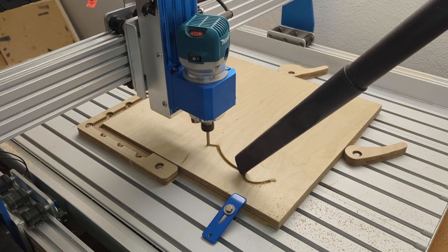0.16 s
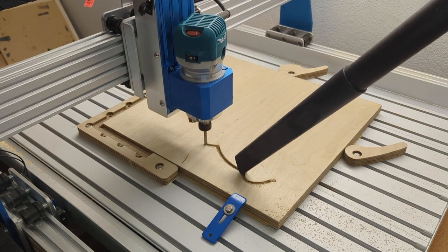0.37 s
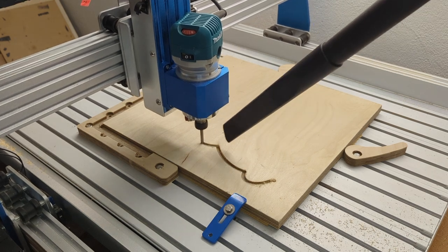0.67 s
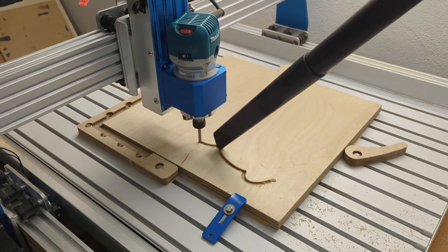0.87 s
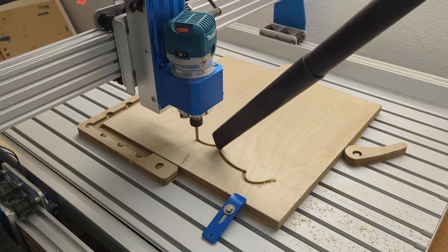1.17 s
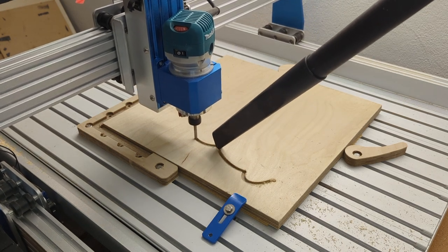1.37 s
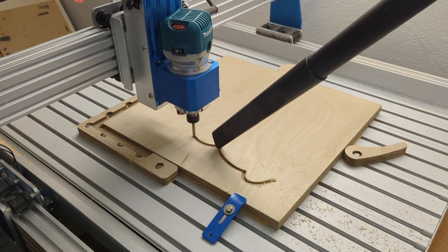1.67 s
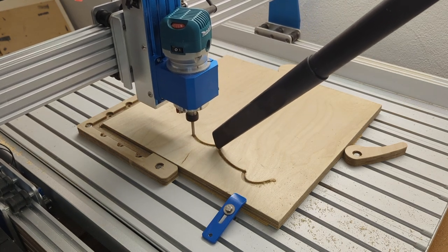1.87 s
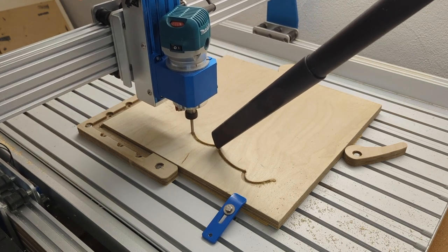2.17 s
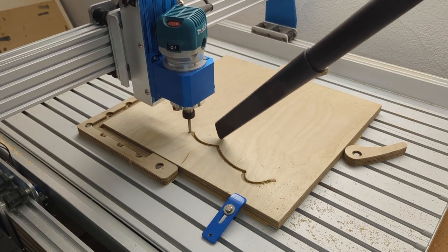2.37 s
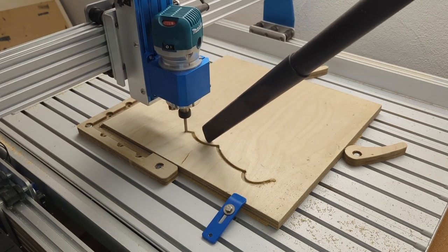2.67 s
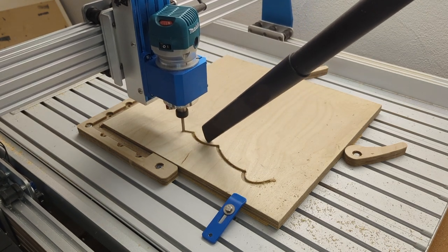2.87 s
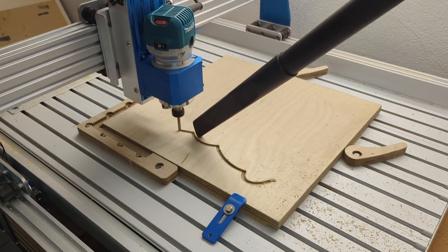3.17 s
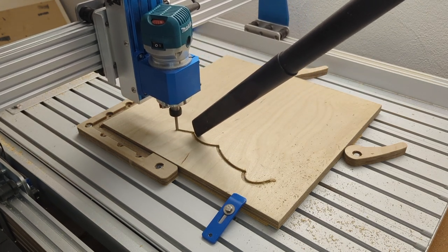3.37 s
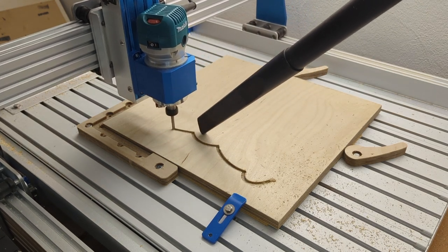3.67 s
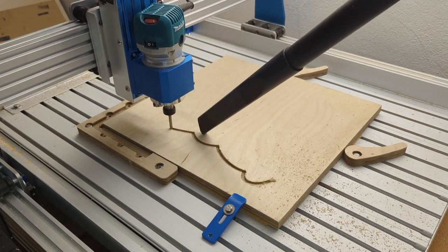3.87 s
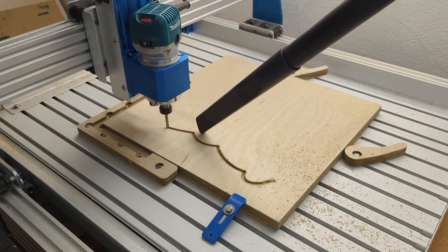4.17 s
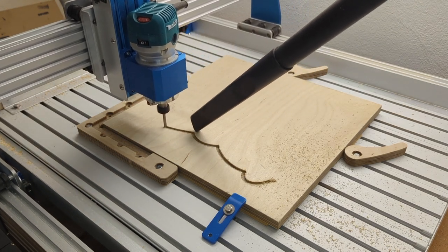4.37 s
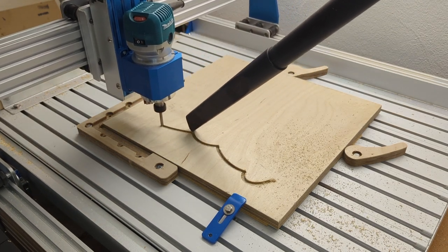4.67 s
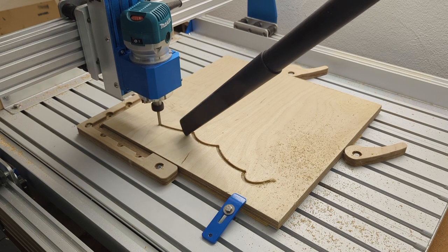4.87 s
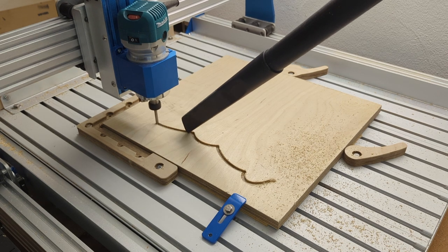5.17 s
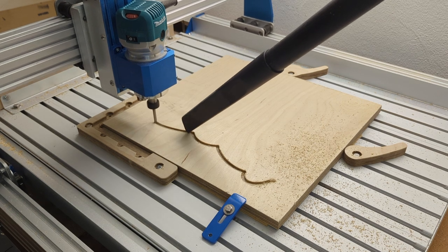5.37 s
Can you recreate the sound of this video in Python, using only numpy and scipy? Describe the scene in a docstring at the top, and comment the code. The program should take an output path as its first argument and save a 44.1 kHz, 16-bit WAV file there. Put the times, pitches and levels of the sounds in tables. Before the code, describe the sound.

The cut is already running at 0 seconds and continues unbroken to about 5.5. A small router spindle gives a hard, buzzy whine near 970 hertz, almost constant in pitch, with strong harmonics. Above it, the bit squeals thinly near 5.6 kilohertz, fluttering at first and clearer from about 0.5 to 1.3 seconds. Between 1.4 and 2.6 the squeal drops and frays while tearing fibres and chip spray grow louder; the whine's overtones jump unevenly around 2.2 to 2.7. From 2.8 to 4.1 the squeal returns with a rapid, rough beating, then becomes steady and clean as the cutting noise eases, picking up slightly at the end. Vacuum hiss stays broad and bright throughout. Faint stepper hum near 250 hertz sags until two seconds, then climbs, with a brief second hum near 1.85. Low frame drone and dull table booms sit quietly beneath. Close stereo pickup, reflective workshop, shifting between sides.

```python
"""In a room with standing waves, a small router on a CNC gantry mills a curve in plywood, heard at two ports.
Passes of the two-flute bit make a whine of harmonics and bursts of noise from torn fibres and flying chips.
The bit also chatters: two close bending modes squeal and beat, and the squeal breaks up in the bend.
A vacuum nozzle hisses around its motor note; a stepper hums up and down with the feed,
a second hums briefly in the bend, the table top booms, and noise drones in the frame's resonances."""
import sys
import numpy as np
from scipy.fft import rfft, irfft, next_fast_len
from scipy.io import wavfile
from scipy.ndimage import map_coordinates

SR = 44100
rng = np.random.default_rng(int(sys.argv[2]) if len(sys.argv) > 2 else 0)


def generate_wav(signal):
    """Clip the signal to [-1, 1] and save it as 16-bit WAV at the path in sys.argv[1]."""
    frames = np.transpose(np.atleast_2d(signal))
    scaled = np.clip(frames, -1, 1) * 32767
    pcm = np.round(scaled).astype(np.int16)
    wavfile.write(sys.argv[1], SR, pcm)


N = 243873


def amp(db):
    """The amplitude factor of a level in dB."""
    return 10 ** (np.asarray(db) / 20)


def unit(x):
    """x scaled to rms 1."""
    return x / np.sqrt(np.mean(np.abs(x) ** 2) + 1e-20)


def seconds():
    """The time of every sample."""
    return np.arange(N) / SR


def along(points, hz):
    """Interpolates (Hz, value) points on a log frequency axis."""
    f, v = np.transpose(points)
    return np.interp(np.log(hz + 1), np.log(f + 1), v)


def curves(rows):
    """One value per sample for each column after the time."""
    s, *cols = np.transpose(rows)
    return [np.interp(seconds(), s, c) for c in cols]


def spell(start, end, fade):
    """0 outside, 1 between start and end, with ramps centred on both."""
    return np.clip(np.minimum(seconds() - start, end - seconds()) / fade + .5, 0, 1)


def swell(s, length):
    """A bell-shaped rise to 1 at time s."""
    return np.exp(-(2 * (seconds() - s) / length) ** 2)


def wobble(rate):
    """A smooth random curve, rate knots a second."""
    knots = rng.standard_normal(int(N * rate / SR) + 4)
    coarse = np.arange(0, N, 16)
    return np.interp(np.arange(N), coarse, map_coordinates(knots, [coarse * rate / SR]))


def filtered(x, response):
    """x times a response of frequency."""
    m = next_fast_len(N + SR // 2)
    spectrum = rfft(x, m) * response(np.fft.rfftfreq(m, 1 / SR))
    return irfft(spectrum, m)[..., :N]


def turning(hz):
    """The phase of something that cycles at a changing rate."""
    return 2 * np.pi * np.cumsum(hz) / SR


# How alike the noise is at the two ports. Each row: frequency in Hz, left-right correlation.
ALIKE = [(30, .6), (90, 0.95), (180, 1), (300, 0.71), (800, 0.9), (1500, 0.75), (2300, 0.65), (3100, -0.8),
         (3550, 0.91), (4400, 0.47), (6800, -0.058), (14000, 0.0015)]
# How noise leans to the left port. Each row: frequency in Hz, left over right in dB.
LEAN = [(200, .3), (1000, 1), (3000, 1), (7000, 0.5), (10500, 2), (12500, 4.5), (15500, 6.5)]


def rush(gain):
    """Stereo noise of rms 1, coloured by a gain of frequency; mid and side shares set the likeness."""
    def mid_side(hz):
        turn = np.arccos(np.clip(along(ALIKE, hz), -1, 1)) / 2
        return gain(hz) * [np.cos(turn), np.sin(turn)]

    def lean(hz):
        return amp(np.outer([.5, -.5], along(LEAN, hz)))

    mid, side = filtered(rng.standard_normal((2, N)), mid_side)
    return unit(filtered(np.array([mid + side, mid - side]), lean))


def tone(phase, level_db, pan_db, lead, rough, flutter):
    """A stereo partial; a share rough of its power is a fuzzy skirt, scattered differently at each port.

    pan_db is left over right, lead the left port's lead in radians, flutter the fuzz in knots a second.
    """
    rough = np.clip(rough, 0, 1)
    right = np.sqrt(2 / (1 + amp(2 * pan_db)))  # keeps the mean power of both ports
    steady, fuzz = np.sqrt(2 - 2 * rough), np.sqrt(rough)
    phase = phase + rng.uniform(-np.pi, np.pi)  # reflections shift each partial differently
    cos, sin = np.cos(phase), np.sin(phase)

    def port(turn):
        in_phase = steady * np.cos(turn) + fuzz * unit(wobble(flutter))
        quadrature = steady * np.sin(turn) + fuzz * unit(wobble(flutter))
        return cos * in_phase - sin * quadrature

    return amp(level_db) * right * np.array([amp(pan_db) * port(lead / 2), port(-lead / 2)])


# Harmonics 1, 2 and 4 of the flute rate.
# Each row: level in dB, drift in dB per s, rise at full load in dB.
WHINE_LEVELS = [(-23.5, -1.06, 2), (-31, -0.81, 7.5), (-28.5, 1.14, -1.5)]
# The third harmonic. Each row: time in seconds, level in dB.
THIRD_LEVEL = [(0, -24.5), (1.05, -21.5), (1.6, -24.5), (2.0, -19.5), (2.6, -26.5), (3.4, -30.5),
               (4.4, -32), (5.5, -26)]
# The fourth shifts to the right as the tool travels. Each row: time in seconds, left over right in dB.
FOURTH_PAN = [(0, -2.5), (2.7, -2.5), (4.2, -8), (5.5, -18)]
# The bit grabs and lets go in the bend, changing the second harmonic.
# Each row: centre in seconds, length in seconds, change in dB.
SNAGS = [(2.171, 0.052, 7), (2.235, 0.043, -9), (2.312, .09, 4), (2.44, 0.16, 5), (2.538, .04, -4),
         (2.62, .046, 3.5), (2.718, .035, 5.5)]
# The sixth lies near the bit's bending mode and takes over while the squeal is broken up.
SIXTH_DB, SIXTH_RISE_DB = -32, 10
SIXTH_START_S, SIXTH_END_S, SIXTH_FADE_S = 1.28, 2.18, 0.21
# Weaker spindle tones: their multiples of the flute rate.
UPPER_ORDERS = [5, 7, 8, 10, 11, 12, 13, 14, 15, 16]
# One for each order, swelling at one spot of the tool's path. Each row: level in dB, left over right in dB,
# left lead in radians, swell time in seconds, swell length in seconds, swell in dB.
UPPER_TONES = [(-35.5, -3, 1.5, 3.6, 0.94, 1.5), (-35.5, 0, 3.5, 4.5, 2, 0), (-33.5, 3, 3.5, 4.3, 2.2, 6),
               (-39.5, -2, -2.2, 1.65, 0.55, 9.5), (-35.5, -2, -2.5, 4.2, 2, 4), (-36, 8, 0.5, 4, 1.3, 5.5),
               (-40.5, 8, 8, 2.4, .6, 3), (-41, -1, 0, 4.6, 1.2, 4), (-45.5, 9, -.3, 4.5, 2, 1.5),
               (-44, 6, 0, 4.8, 2, 4)]


def spindle(flute, load, judder):
    """Flute passes make a harmonic whine, which roughens when the cut is unsteady."""
    t = seconds()
    db1, db2, db4 = [db + drift * t + rise * load for db, drift, rise in WHINE_LEVELS]
    db3, = curves(THIRD_LEVEL)
    pan4, = curves(FOURTH_PAN)
    db6 = SIXTH_DB + SIXTH_RISE_DB * spell(SIXTH_START_S, SIXTH_END_S, SIXTH_FADE_S) + 2 * wobble(3.7)
    grab_db = sum(db * swell(s, length) for s, length, db in SNAGS)
    db1 = db1 + 0.63 * wobble(30)
    db2 = db2 + grab_db + 1.4 * judder * wobble(14)
    db4 = db4 + 0.63 * wobble(3.88)
    # the router sways in its mount
    shake = turning(26 + 3.5 * wobble(6))
    swayed = flute + 0.12 * judder * np.sin(shake)

    out = tone(flute, db1, pan_db=-0.7, lead=0.021, rough=0.0023 + 0.035 * judder, flutter=120)
    out += tone(2 * swayed, db2, pan_db=4.0, lead=-0.64, rough=0.11 + 0.12 * judder, flutter=110)
    out += tone(3 * swayed, db3, pan_db=-0.5, lead=-2.28, rough=0.034 + 0.22 * judder, flutter=89)
    out += tone(4 * flute, db4, pan_db=pan4, lead=-2.31, rough=0.012 + 0.22 * judder, flutter=90)
    out += tone(6 * flute, db6, pan_db=-10, lead=2.16, rough=0.012 + 0.19 * judder, flutter=75)
    for order, (level_db, pan_db, lead, s, length, swell_db) in zip(UPPER_ORDERS, UPPER_TONES):
        # the tool travels through the room's standing waves
        level = level_db + swell_db * swell(s, length) + 1.3 * wobble(3.76)
        out += tone(order * flute, level, pan_db, lead, rough=0.14 + 0.59 * judder, flutter=45)
    return out


# Bending vibration of the bit, before the second mode pulls it up.
# Each row: time in seconds, pitch in Hz.
SQUEAL_PITCH = [(0, 5614), (.9, 5611), (1.33, 5593), (1.47, 5521), (1.75, 5515), (2.3, 5574), (2.55, 5615),
                (2.8, 5561), (3.5, 5568), (3.9, 5584), (4.25, 5593), (5.5, 5596)]
# How the squeal reaches the two ports along the tool's path, before the second mode shifts it left.
# Each row: time in seconds, left over right in dB, left lead in radians.
SQUEAL_PLACE = [(0, -12, 1.3), (.4, -6, .2), (.8, 1.5, 0.54), (1.5, -4, 1.08), (2.3, -5, 0.92),
                (2.6, -0.5, 3.3), (3.4, 3, 2.8), (3.95, -5, 3.96), (4.9, -15.5, 4.3), (5.5, -2.5, 3.2)]
# The squeal's level at the start, its drift, and its change while broken up.
SQUEAL_DB, SQUEAL_DB_PER_S, BREAKUP_DB = -19.5, .5, -8
# The squeal breaks up in the bend: start, end and fade, all in seconds.
BREAKUP = (1.403, 2.62, .28)
# The second bending mode joins in and beats with the first.
# Each row: start in seconds, end in seconds, share of the power.
TWIN_SPELLS = [(-.2, 0.357, 0.264), (2.832, 4.153, .37)]
TWIN_FADE_S, BEAT_HZ = 0.17, 33.3
# The flutes chop the squeal into sidebands. Each row: multiple of the squeal, flute rates added.
SIDEBAND_ORDERS = [(1, -3), (1, -1), (1, 1), (1, 2), (1, 3), (1, 4), (1, 7), (1, 8), (1, 10), (2, 2),
                   (2, 3)]
# One for each sideband. Each row: level in dB, left over right in dB, left lead in radians,
# swell time in seconds, swell length in seconds, swell in dB.
SIDEBAND_TONES = [(-39, 0, 1.5, 0.94, 2.1, 9), (-38.5, 1, -2, 1.1, 0.65, 8),
                  (-31, -1.5, -2.5, 4.7, 1.8, 1.5), (-32, 1.5, -1.2, 3.87, 2, 7.5),
                  (-31, 0, -2, 4.4, 1.8, 5), (-38.5, -2, 1.5, 4.26, 1, 7.5), (-37.5, 4, -3.5, 1.1, 1.3, 4),
                  (-33, 5, 1.5, 1.2, .8, 7), (-42, 6, 1, 5.4, .5, 8), (-33, 1, -1.5, .9, 1.4, 2),
                  (-34, -2, 0, .8, 4, -2)]


def chatter(flute, judder):
    """The bit squeals in two close bending modes that beat; each flute pass chops the squeal into sidebands."""
    broken = spell(*BREAKUP)
    pitch, = curves(SQUEAL_PITCH)
    pan_db, lead = curves(SQUEAL_PLACE)
    squeal_db = SQUEAL_DB + SQUEAL_DB_PER_S * seconds() + BREAKUP_DB * broken + 1.2 * wobble(4.93)
    share = sum(part * spell(start, end, TWIN_FADE_S) for start, end, part in TWIN_SPELLS)
    share = np.clip(share, 0, .45)
    unrest = np.clip(.03 + 0.785 * judder + 0.491 * broken, 0, 1)
    unrest = unrest * (1 - 2 * share)  # a locked pair of modes scatters less
    bend = turning(pitch + 40 * share + (2.35 + 20 * unrest) * wobble(30))
    gap = turning(BEAT_HZ + 2 * wobble(10))

    first = tone(bend, squeal_db, pan_db + 12 * share, lead, rough=0.71 * unrest, flutter=100)
    second = tone(bend - gap, squeal_db + 0.34, pan_db=-9, lead=3.0, rough=0.14, flutter=60)
    out = np.sqrt(1 - share) * first + np.sqrt(share) * second
    for (multiple, shift), row in zip(SIDEBAND_ORDERS, SIDEBAND_TONES):
        level_db, side_pan_db, side_lead, s, length, swell_db = row
        beat_db = 4 * share * np.cos(gap)
        level = level_db + swell_db * swell(s, length) + beat_db + 1.2 * wobble(4)
        phase = multiple * bend + shift * flute
        out += tone(phase, level, side_pan_db, side_lead, rough=0.065 + 0.62 * unrest, flutter=60)
    return out


# Colour of the tearing fibres. Each row: frequency in Hz, relative level in dB.
TEARING = [(30, -55), (200, -42), (450, -11), (720, -4.5), (900, -1.5), (1200, -6.5), (1600, -2), (1950, 4),
           (2400, 1.5), (2750, 7), (3300, 9), (3520, -6.5), (3900, -2.5), (4400, -4), (6000, -8),
           (15000, -28)]
# Colour of the flying chips. Each row: frequency in Hz, relative level in dB.
SPRAY = [(2000, -53), (4000, -2.5), (5100, -2), (5600, 6.5), (6500, 1.5), (7600, 2), (8500, 2), (9000, -10),
         (10500, -0.5), (12000, -5.5), (15500, 0.5)]
# Levels with no load, their rise at full load, and the spray thinning along the path.
TEAR_DB, TEAR_LOAD_DB = -28, 4.5
SPRAY_DB, SPRAY_LOAD_DB, SPRAY_DB_PER_S = -23.5, 4.5, -0.66


def cutting(flute, load):
    """Fibres tear and chips fly in one burst per flute pass, louder under load; wood grain varies the bite."""
    grain_db = 1.3 * wobble(160) + 0.9 * wobble(18)
    bursts = unit(1 + 0.18 * np.cos(flute)) * amp(grain_db)
    tear_db = TEAR_DB + TEAR_LOAD_DB * load
    spray_db = SPRAY_DB + SPRAY_LOAD_DB * load + SPRAY_DB_PER_S * seconds()
    tearing = amp(tear_db) * rush(lambda hz: amp(along(TEARING, hz)))
    spray = amp(spray_db) * rush(lambda hz: amp(along(SPRAY, hz)))
    return bursts * (tearing + spray)


# Colour of the air at the nozzle. Each row: frequency in Hz, relative level in dB.
AIR = [(25, -52), (60, -28), (120, -7.5), (400, -12), (750, -7.5), (1150, -9), (3000, -14), (4200, -4.5),
       (7000, -1.5), (10300, -2.5), (11600, -3.5), (12400, 3.5), (13500, 0.5), (14300, -5), (15700, -2.5)]
HISS_DB = -20


def vacuum():
    """Air rushes unevenly into the nozzle; the suction motor adds a nearly steady note."""
    hiss_db = HISS_DB + .4 * wobble(3.17) + 0.28 * wobble(14)
    hiss = amp(hiss_db) * rush(lambda hz: amp(along(AIR, hz)))
    motor = turning(1021.5 + .8 * wobble(3))
    return hiss + tone(motor, level_db=-41.5, pan_db=2, lead=-.2, rough=.1, flutter=15)


# Feed speed of the main axis, slowest in the bend. Each row: time in seconds, stepper hum in Hz.
STEP_RATE = [(0, 244), (.4, 262.8), (.9, 266.7), (1.25, 261.4), (1.7, 236.7), (2.03, 212), (2.15, 238.3),
             (3, 250.1), (4.4, 261.2), (4.7, 266), (5.5, 264.5)]
# The hum grows with the load and swells when it meets a resonance of the gantry.
HUM_DB, HUM_LOAD_DB = -53, 8
HUM_GAIN_DB, HUM_CENTRE_HZ, HUM_WIDTH_HZ = 12, 253.2, 7.5
# The cross axis speeds up briefly in the bend: time, pitch and level at its loudest.
CROSS_S, CROSS_LENGTH_S, CROSS_HZ, CROSS_HZ_PER_S, CROSS_DB = 1.85, 0.24, 280, 230, -41.5


def steppers(load):
    """Two stepper motors hum at their feed speeds; the main one also sounds its octave."""
    step_hz, = curves(STEP_RATE)
    resonance_db = HUM_GAIN_DB / (1 + ((step_hz - HUM_CENTRE_HZ) / HUM_WIDTH_HZ) ** 2)
    step_db = HUM_DB + HUM_LOAD_DB * load + resonance_db + 1.8 * wobble(7)
    step = turning(step_hz)
    hum = tone(step, step_db, pan_db=1.5, lead=0.13, rough=0.033, flutter=25)
    hum += tone(2 * step, step_db - 19.0, pan_db=9.0, lead=.3, rough=0.32, flutter=20)
    cross = turning(CROSS_HZ + CROSS_HZ_PER_S * (seconds() - CROSS_S))
    cross_hum = tone(cross, CROSS_DB, pan_db=1.5, lead=.3, rough=.1, flutter=36)
    return hum + swell(CROSS_S, CROSS_LENGTH_S) * cross_hum


# Booms of the table top, on top of a wavering floor; the tone takes 1 dB off both.
# Each row: start in seconds, length in seconds, level in dB.
BOOMS = [(0.228, 0.18, -42), (.69, .05, -49), (0.934, .07, -47), (1.39, .13, -42), (2.154, .14, -50),
         (2.37, .13, -45), (2.701, .12, -48), (3.23, 0.078, -47), (3.42, 0.17, -44), (3.66, 0.18, -45),
         (4.812, .12, -42), (5, 0.048, -47), (5.267, .08, -50)]
BOOM_FADE_S, BOOM_FLOOR_DB = .06, -52


def table_top():
    """The table top booms in one low, wavering mode."""
    level = amp(BOOM_FLOOR_DB + 2.9 * wobble(18))
    level = level + sum(amp(db) * spell(s, s + length, BOOM_FADE_S) for s, length, db in BOOMS)
    mode = turning(101 + 1.65 * wobble(8.6))
    return level * tone(mode, level_db=-1.0, pan_db=-1.5, lead=0.12, rough=0.028, flutter=30)


# Resonances of the machine frame. Each row: frequency in Hz, half width in Hz, relative level in dB.
FRAME = [(139.3, 12, -1), (145, 5.6, -10), (179.4, 9.5, 0.5), (200.6, 6.1, 3), (228, 6.4, -5),
         (260, 15.5, -5.5), (298, 5.6, -15), (346, 21, -10.5)]


def frame_drone():
    """Noise drones in the resonances of the machine frame."""
    def modes(f):
        power = sum(amp(db) ** 2 / (1 + ((f - hz) / width) ** 2) ** 2 for hz, width, db in FRAME)
        return np.sqrt(power) * f ** 2 / (f ** 2 + 60 ** 2)  # a small frame radiates little deep bass

    return amp(-39.0) * rush(modes)


# How hard the bit bites. Each row: time in seconds, load from 0 to 1.
LOAD = [(0, .45), (.6, 0.06), (1.3, 0.31), (1.6, 0.87), (2.3, 1), (3.4, .65), (4.0, 0.44), (4.8, 0.01),
        (5.5, 0.27)]
# How unsteadily the flutes bite. Each row: time in seconds, roughness from 0 to 1.
UNSTEADY = [(0, 0.5), (.5, 0.03), (1.3, 0.1), (2.1, 0.13), (2.3, 0.49), (2.8, .68), (3.4, 0.71),
            (4.3, 0.06), (5.5, 0)]
# Flute passes a second when running free, and the sag under full load.
FLUTE_HZ, SAG_HZ = 966.9, 0.8


def scene():
    """The load on the bit slows the spindle a little and drives the whine, the tearing and the hum."""
    load, = curves(LOAD)
    judder, = curves(UNSTEADY)
    flute = turning(FLUTE_HZ - SAG_HZ * load + 0.432 * wobble(12))
    bit = spindle(flute, load, judder) + chatter(flute, judder) + cutting(flute, load)
    return bit + vacuum() + steppers(load) + table_top() + frame_drone()


NOTCH_HZ, NOTCH_HALF_WIDTH_HZ, NOTCH_DB, TOP_HZ = 8210, 150, -34, 15740


def record(dry):
    """The microphone has a narrow notch in the treble and a band limit."""
    def response(hz):
        notch = 1 - (1 - amp(NOTCH_DB)) / (1 + 1j * (hz - NOTCH_HZ) / NOTCH_HALF_WIDTH_HZ)
        return notch * (hz < TOP_HZ)

    return filtered(dry, response)


dry = scene()
out = record(dry)
generate_wav(out)
```